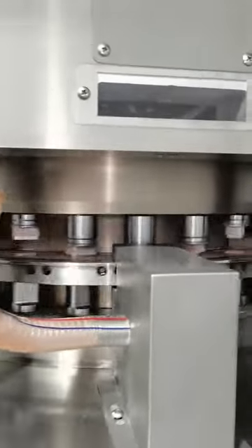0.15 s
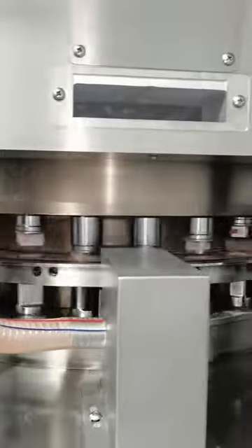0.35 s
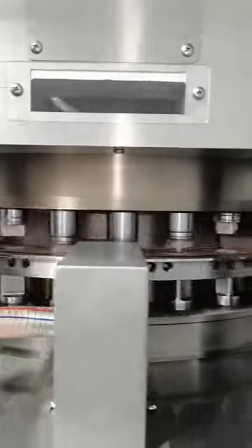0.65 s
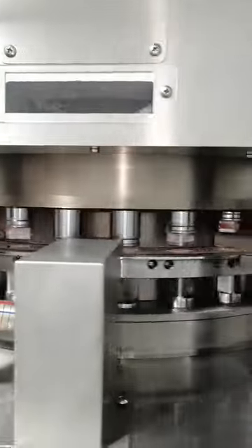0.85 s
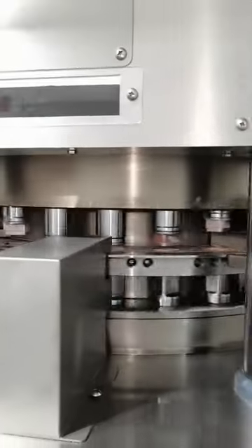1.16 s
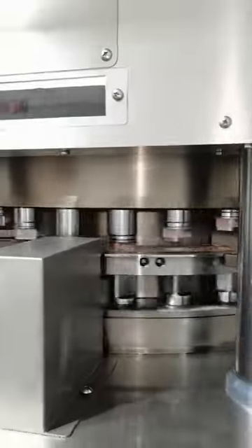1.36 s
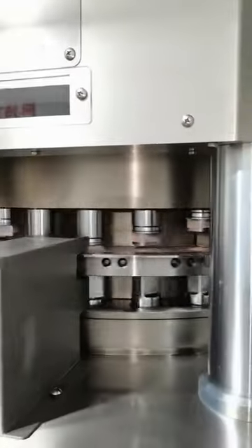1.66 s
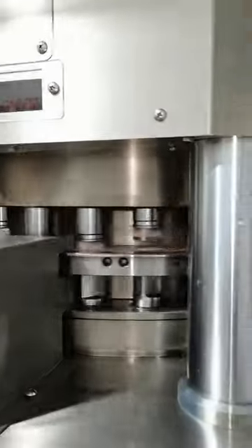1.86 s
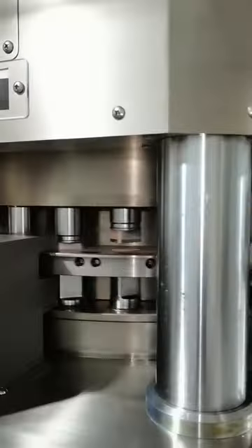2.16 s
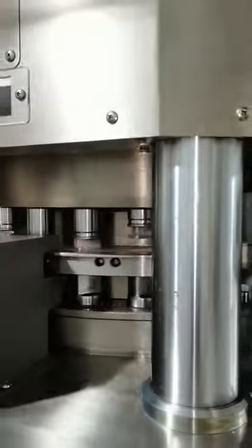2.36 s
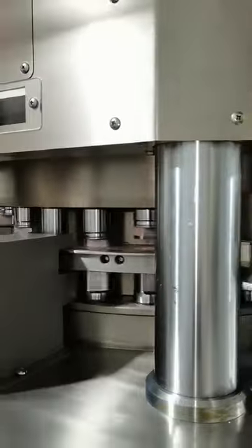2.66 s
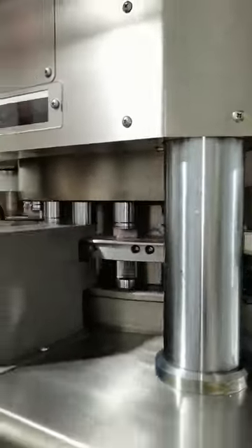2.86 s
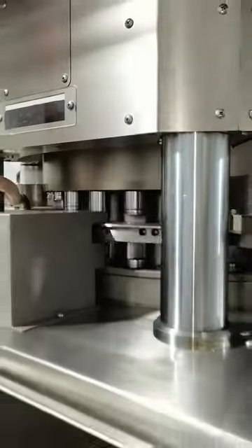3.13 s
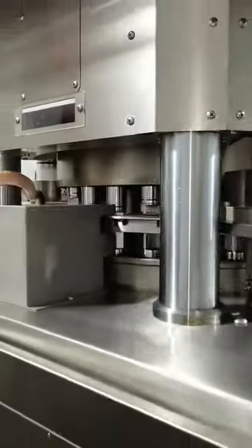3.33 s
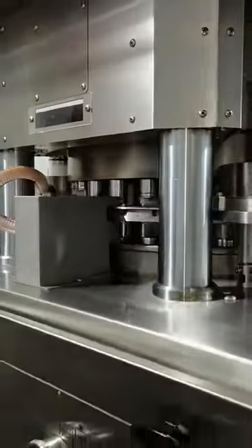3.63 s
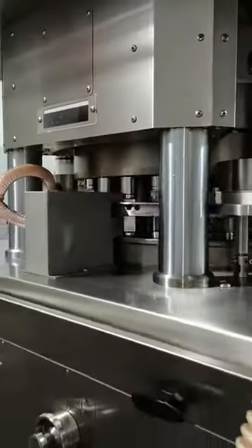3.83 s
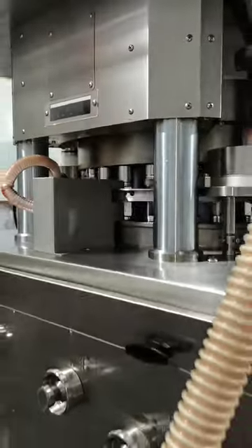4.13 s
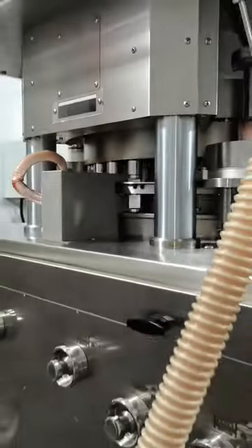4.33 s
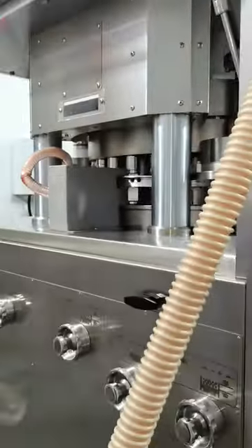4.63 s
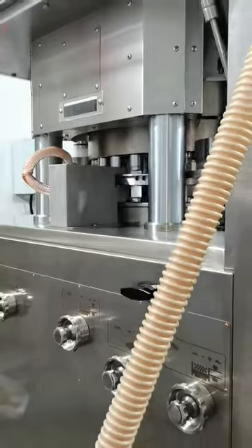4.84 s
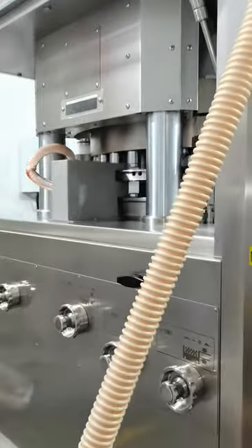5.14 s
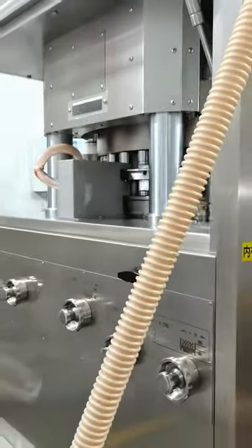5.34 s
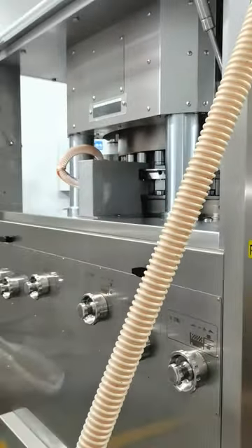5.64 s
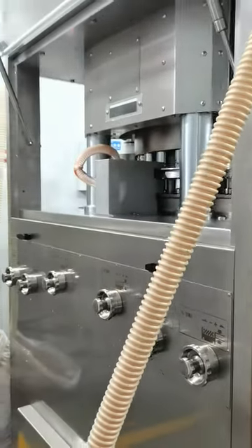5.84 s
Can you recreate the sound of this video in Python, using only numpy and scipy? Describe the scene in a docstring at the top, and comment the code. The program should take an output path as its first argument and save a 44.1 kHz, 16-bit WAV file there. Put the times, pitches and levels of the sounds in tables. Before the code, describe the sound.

A rotary tablet press runs without pause in a factory room. A strong fan hum with a fast fluttering ripple sits in front, over suction hiss, motor rumble and thin whine. Punches tick in uneven pairs nearly four times a second, with occasional steel clinks. A hand-held stereo microphone moves along it; the hum dips midway, then returns loudest.

```python
"""Factory room: a rotary tablet press runs while a hand-held microphone moves along it.
Behind: suction hiss and air rush (coloured noise), motor rumble and thin drive whine (unsteady tones).
Punches tick and steel parts clink: short bursts of resonant noise.
In front: three fan tones at nearly the same speed beat in a fast ripple; levels follow the standing waves.
Rush, whine and overtones sink late as the hum grows."""
import sys
import numpy as np
from scipy import signal
from scipy.fft import rfft, irfft
from scipy.io import wavfile

SR = 44100
rng = np.random.default_rng(int(sys.argv[2]) if len(sys.argv) > 2 else 0)


def master(y):
    """Save y as 16-bit WAV."""
    cut = np.clip(np.atleast_2d(y).T, -1, 1)
    pcm = np.round(cut * 32767)  # scale
    wavfile.write(sys.argv[1], SR, pcm.astype(np.int16))


N = 264159
T = np.arange(N) / SR
BINS_HZ = np.fft.rfftfreq(N, 1 / SR)
FADE_START_S = 4.34


def amp(db):
    """Decibels to gain."""
    return 10 ** (np.asarray(db) / 20)


def unit(x):
    """Scales to rms 1."""
    return x / np.sqrt(np.mean(abs(x) ** 2) + 1e-20)


def curve(rows, column):
    """One column of a time table, interpolated at every sample."""
    rows = np.asarray(rows)
    return np.interp(T, rows[:, 0], rows[:, column])


def shape(points):
    """A spectrum table at every bin, interpolated over log frequency."""
    hz, value = np.transpose(points)
    return np.interp(np.log(BINS_HZ + 1), np.log(hz + 1), value)


def sides(balance_db):
    """Left and right gains for a left-minus-right level difference."""
    return amp(np.array([[.5], [-.5]]) * balance_db)


def bump(hz, width_hz):
    """Gain of one resonance at every bin."""
    return 1 / (1 + (2 * (BINS_HZ - hz) / width_hz) ** 2)


def colour(x, gain):
    """Filters by a gain for every bin."""
    return irfft(rfft(x) * gain, N)


def swell(middle_s, length_s):
    """A smooth rise to 1 and back, about half high at the ends of its length."""
    return np.exp(-np.pi * ((T - middle_s) / length_s) ** 2)


def sinking(db_per_s, start_s):
    """Gain falling steadily in dB from start_s."""
    return amp(-db_per_s * np.maximum(T - start_s, 0))


def drift(rate_hz):
    """Slow complex chance of rms 1: 24 waves from all directions, Doppler shifts up to rate_hz."""
    coarse_s = T[::64]
    angle, start = rng.random((2, 24, 1))
    shift_hz = rate_hz * np.cos(np.pi * angle)
    waves = np.exp(2j * np.pi * (shift_hz * coarse_s + start))
    return np.interp(T, coarse_s, unit(waves.sum(0)))


# Likeness of the two microphone ports: hz, correlation (-1 to 1)
PORT_LIKENESS = [(60, 0.67), (150, 0.94), (300, 0.86), (600, 0.71), (1100, 0.0076), (3000, 0.0055),
                 (15000, 0)]


def room_noise(gain):
    """Coloured noise of rms 1 at two ports: alike in the bass, unrelated in the treble."""
    left, other = rfft(rng.standard_normal((2, N)))
    same = np.clip(shape(PORT_LIKENESS), -1, 1)
    right = same * left + np.sqrt(1 - same ** 2) * other
    return unit(irfft(np.array([left, right]) * gain, N))


def roaming_tone(phase_rad, fade_rate_hz, direct=0.65, port_lag_rad=1.0):
    """A tone heard on the move: a direct part plus reflections that fade separately at each port."""
    arrival_rad = 2 * np.pi * rng.random() + port_lag_rad * rng.standard_normal(2)
    field = [unit(direct * np.exp(1j * angle) + drift(fade_rate_hz)) for angle in arrival_rad]
    return np.sqrt(2) * (np.array(field) * np.exp(1j * phase_rad)).real


# Suction hiss spectrum before scaling to rms 1: hz, relative_db_per_hz
HISS_SPECTRUM = [(4500, -13.5), (5900, -10.5), (6900, 0), (7800, 0.5), (9800, -8.5), (11000, -10.5),
                 (12000, -11), (13800, -15), (15000, -20.5)]
# Suction hiss stereo: hz, left_minus_right_db
HISS_BALANCE_SPECTRUM = [(6000, -7), (7800, -0.5), (10000, 0), (12000, -5.5), (15000, -7.5)]


def suction(level_db=-23.0, flutter=0.1, nearest_s=4.1, passing_s=1.2, nearest_db=1.3):
    """Bright, even hiss of the dust extraction, a little louder as its hose passes."""
    noise = room_noise(amp(shape(HISS_SPECTRUM)) * sides(shape(HISS_BALANCE_SPECTRUM)))
    passing = amp(nearest_db * swell(nearest_s, passing_s))
    return amp(level_db) * noise * passing * (1 + flutter * drift(37).real)


def opening(boost_db, middle_s=1.5, length_s=2.1):
    """Gain of the housing's hollow resonance, swelling as the open side of the turret housing passes."""
    return amp(boost_db * swell(middle_s, length_s))


# Air and running gear spectra before scaling to rms 1, one per side: hz, relative_db_per_hz
RUSH_LEFT_SPECTRUM = [(20, -30), (60, -6.5), (100, 1.5), (135, 4.5), (180, -1), (330, -2), (500, -5.5),
                      (1000, -5.5), (1140, -8.5), (1350, -6), (2150, -9.5), (2800, -11), (3200, -14.5),
                      (4100, -6.5), (4700, -14)]
RUSH_RIGHT_SPECTRUM = [(20, -31), (60, -13), (130, -4), (330, -4), (500, -9), (1000, -7), (1140, -7.5),
                       (1350, -5), (2400, -8), (2850, -12), (3300, -12.5), (3550, -9.5), (4100, -4),
                       (4750, -8.5), (5100, -5.5), (5400, -8.5)]


def rush(level_db=-20.0, top_hz=6500, hollow_hz=650, hollow_width_hz=700, flutter=0.044):
    """Air and running gear; the hollow middle swells where the housing opens toward the microphone."""
    spectra = amp([shape(RUSH_LEFT_SPECTRUM), shape(RUSH_RIGHT_SPECTRUM)])
    noise = room_noise(spectra / np.sqrt(1 + (BINS_HZ / top_hz) ** 12))
    bass = colour(noise, 1 / (1 + (BINS_HZ / 300) ** 4))
    hollow = colour(noise - bass, bump(hollow_hz, hollow_width_hz))
    clatter = (noise - bass - hollow) * (1 + flutter * drift(14).real)
    bass = bass * sinking(db_per_s=3.0, start_s=FADE_START_S)
    upper = (hollow * opening(boost_db=2.0) + clatter) * sinking(db_per_s=2.0, start_s=FADE_START_S)
    return amp(level_db) * (bass + upper)


# Strongest throbs of the frame: middle_s, length_s, level_db
FRAME_THROBS = [(.09, .09, -26), (.46, 0.096, -32), (.8, 0.28, -37), (1.03, 0.21, -28), (1.76, 0.17, -33),
                (2.322, 0.11, -32), (2.7, 0.11, -33), (3.475, 0.24, -31.5), (4.08, .1, -28.5),
                (4.613, 0.096, -28), (5.35, .09, -32)]


def motor(shaft_hz=49.2, shaft_start_db=-47.5, shaft_db_per_s=1.35, rumble_hz=95.8, rumble_db=-44.5,
          wander_hz=2.1, flutter_rate_hz=5.4, balance_db=8.0):
    """Shaft tone growing steadily; the frame throbs unevenly near twice its rate."""
    shaft = amp(shaft_start_db + shaft_db_per_s * T) * np.sin(2 * np.pi * shaft_hz * T)
    phase_rad = 2 * np.pi * np.cumsum(rumble_hz + wander_hz * drift(8).real) / SR
    throb = amp(rumble_db) * drift(flutter_rate_hz)
    for middle_s, length_s, level_db in FRAME_THROBS:
        throb = throb + amp(level_db) * swell(middle_s, length_s)
    frame = (throb * np.exp(1j * phase_rad)).real
    return np.sqrt(2) * (shaft + frame) * sides(balance_db)


# Drive whine, low and high cluster, before the cluster gain: pitch_hz, relative_db
LOW_WHINE_TONES = [(3817, -50), (3890, -46), (3980, -41), (4056, -36), (4109, -34), (4183, -46),
                   (4220, -49), (4500, -48)]
HIGH_WHINE_TONES = [(7300, -48), (7440, -47), (7773, -46), (8113, -44), (11946, -49), (12170, -53)]
# Swells of the low cluster: middle_s, length_s, boost_db
LOW_WHINE_SWELLS = [(0.095, 0.22, 7), (.8, .15, 4.5), (1.11, 0.26, 6), (4.18, 0.14, 7)]


def drive(fade_rate_hz=3., jitter_hz=2.5, balance_db=-5.5, direct=1.03, port_lag_rad=0.84,
          low_gain_db=1.0, high_gain_db=-4.5):
    """Two clusters of thin tones from the motor drive share one pitch jitter; the low one swells at times."""
    wobble_rad = 2 * np.pi * np.cumsum(jitter_hz * drift(30).real) / SR

    def cluster(tones):
        """Sum of separately fading tones."""
        return sum(amp(db) * roaming_tone(2 * np.pi * hz * T + wobble_rad, fade_rate_hz, direct, port_lag_rad)
                   for hz, db in tones)

    swells_db = sum(db * swell(middle_s, length_s) for middle_s, length_s, db in LOW_WHINE_SWELLS)
    low = cluster(LOW_WHINE_TONES) * amp(low_gain_db + swells_db)
    high = cluster(HIGH_WHINE_TONES) * amp(high_gain_db)
    return (low + high) * sides(balance_db) * sinking(db_per_s=1.3, start_s=FADE_START_S)


# Stray metal clinks: start_s, level_db, pitch_hz
METAL_CLINKS = [(1.232, -25, 3520), (1.503, -25, 5100), (2.052, -18, 5110), (3.677, -22, 3590),
                (4.215, -25, 5120)]


def clinks(width_hz=170, rise_s=0.0016, t60_s=0.21):
    """Loose steel parts touch now and then: narrow-band noise with a fast rise and a short decay."""
    out = np.zeros((2, N))
    for start_s, level_db, pitch_hz in METAL_CLINKS:
        age_s = np.maximum(T - start_s, 0)
        decay = amp(level_db - 60 * age_s / t60_s)
        out += room_noise(bump(pitch_hz, width_hz)) * (1 - np.exp(-age_s / rise_s)) * decay
    return out


# Punch resonances before scaling to rms 1: pitch_hz, width_hz, relative_db
PUNCH_RESONANCES = [(1980, 1200, -15), (2220, 870, 11.5), (3390, 480, 5.5), (5130, 330, 0),
                    (6000, 6700, 0.5)]


def punches(stroke_s=.27174, first_stroke_s=.136, gain_db=-22.5, rise_s=0.0041, fall_s=0.025,
            return_s=0.175, return_db=-5, balance_db=-3):
    """Each punch scuffs under the pressure roller, then knocks more softly on its cam."""
    blows = np.zeros(N)
    for start_s in np.arange(first_stroke_s - stroke_s, T[-1], stroke_s):
        for delay_s, blow_db in ((0, 0), (return_s, return_db)):
            age_s = np.maximum(T - start_s - delay_s, 0)
            blow = (1 - np.exp(-age_s / rise_s)) * np.exp(-age_s / fall_s)
            blows += 2 * amp(blow_db + rng.uniform(-0.9, 1)) * blow
    steel = room_noise(sum(amp(db) * bump(hz, width_hz) for hz, width_hz, db in PUNCH_RESONANCES))
    return amp(gain_db) * steel * blows * sinking(db_per_s=1.4, start_s=1.86) * sides(balance_db)


# Room spots where overtones near one pitch stand out: middle_s, length_s, pitch_hz, boost_db
OVERTONE_SPOTS = [(.65, .5, 935, 5), (.9, .5, 1560, 4), (1.2, .4, 1250, 4), (1.6, .7, 1000, 7.5),
                  (1.7, 1.5, 640, 9.5), (3.3, .5, 640, 3), (2.1, .55, 935, 6), (3.95, .7, 1000, 6),
                  (4.15, .45, 2190, 7), (5.6, 1.2, 1000, 4)]


def fan(hz, track, overtones, lead_rad, lead_rad_per_s=0, wander_hz=0.24, fade_hz_per_multiple=.3, direct=8.9,
        port_lag_rad=0.85, overtone_balance_db=-8.5, spot_width_hz=40):
    """A steady blade tone with overtones; shorter waves fade faster and deeper as the microphone moves."""
    phase_rad = 2 * np.pi * (np.cumsum(hz + wander_hz * drift(0.99).real) / SR + rng.random())
    ports = np.array([np.cos(phase_rad), np.cos(phase_rad - lead_rad - lead_rad_per_s * T)])
    blade = np.sqrt(2) * amp(curve(track, column=1)) * sides(curve(track, column=2)) * ports
    upper = np.zeros((2, N))
    for multiple, level_db in overtones:
        tone_hz = multiple * hz
        boost_db = sum(spot_db * swell(middle_s, length_s)
                       for middle_s, length_s, spot_hz, spot_db in OVERTONE_SPOTS
                       if abs(tone_hz - spot_hz) < spot_width_hz)
        tone = roaming_tone(2 * np.pi * tone_hz * T, fade_hz_per_multiple * multiple,
                            direct / multiple, port_lag_rad)
        upper += amp(level_db + boost_db) * tone
    return blade + upper * sides(overtone_balance_db) * sinking(db_per_s=1.0, start_s=FADE_START_S)


# Blade tone of each fan across the standing waves: time_s, level_db, left_minus_right_db
MAIN_FAN_TRACK = [(0, -17, -6), (.55, -21, -10), (.8, -22, 7.5), (1.25, -15, 5.5), (2, -15, 4),
                  (2.75, -18, 3), (3.35, -27.5, 2), (3.62, -25, -4), (4.15, -13.5, 2.6), (5.6, -10, 3.5)]
SECOND_FAN_TRACK = [(0, -26.5, 3), (1.25, -27, 4), (2, -23, -7), (2.7, -20, 10.5), (3.5, -24.5, 10.5),
                    (4.4, -26.5, 11), (5.99, -20, 7)]
THIRD_FAN_TRACK = [(.2, -29.5, -3), (.9, -29, 16), (2.5, -20.5, 12), (3.35, -24.5, -14), (3.9, -20, 2),
                   (5.6, -19, -1)]
# Overtones of each fan, before room spots and sinking: multiple, level_db
MAIN_FAN_OVERTONES = [(2, -40.5), (3, -37.5), (4, -41), (5, -40.5), (6, -39.5), (7, -41), (8, -45),
                      (14, -49), (16, -49)]
SECOND_FAN_OVERTONES = [(2, -44), (3, -40), (4, -41), (5, -53), (6, -47)]
THIRD_FAN_OVERTONES = [(2, -45.5), (3, -51)]


def fans():
    """Three blade tones a few hertz apart: their sum beats at the differences."""
    main = fan(312.58, MAIN_FAN_TRACK, MAIN_FAN_OVERTONES, lead_rad=-0.0049)
    second = fan(331.72, SECOND_FAN_TRACK, SECOND_FAN_OVERTONES, lead_rad=0., lead_rad_per_s=0.77)
    third = fan(337.85, THIRD_FAN_TRACK, THIRD_FAN_OVERTONES, lead_rad=0.088)
    return main + second + third


def scene():
    """All sources, background to front."""
    return suction() + rush() + motor() + drive() + clinks() + punches() + fans()


# Treble dip of the whole sound: hz, gain_db
TREBLE_DIP = [(7950, 0), (8250, -6), (8600, -17.5), (9250, -11), (9750, 0.5)]


def record(dry, knee=0.74, headroom=.15, edge_hz=15200):
    """A narrow treble dip near 8.6 kHz; peaks above the knee are rounded off; then a low-pass."""
    heard = colour(dry, amp(shape(TREBLE_DIP)))
    clean = np.clip(heard, -knee, knee)
    rounded = clean + headroom * np.tanh((heard - clean) / headroom)
    low_pass = signal.firwin(511, edge_hz, window=("kaiser", 9), fs=SR)
    return signal.oaconvolve(rounded, low_pass[None], "same", axes=1)


dry = scene()
out = record(dry)
master(out)
```